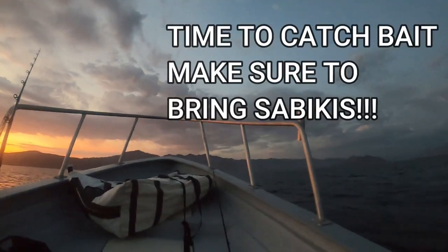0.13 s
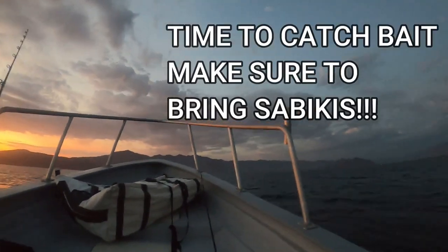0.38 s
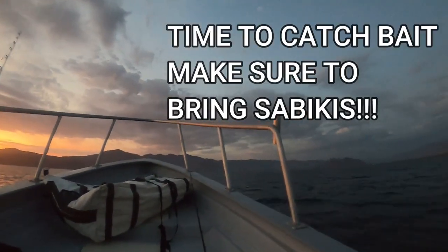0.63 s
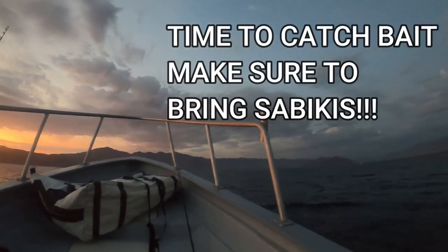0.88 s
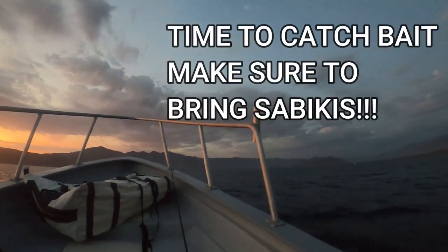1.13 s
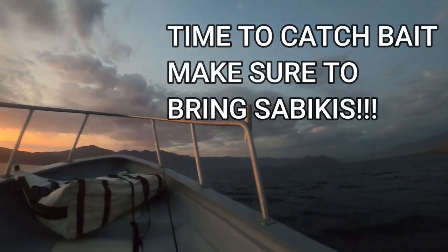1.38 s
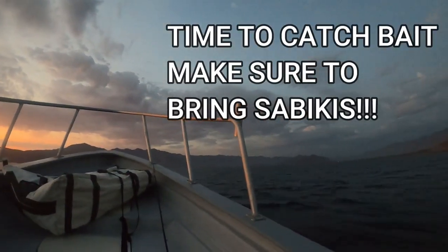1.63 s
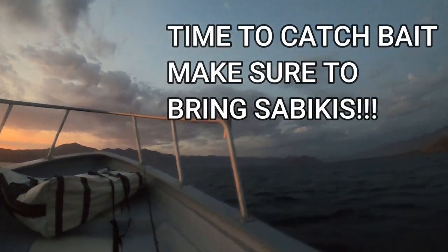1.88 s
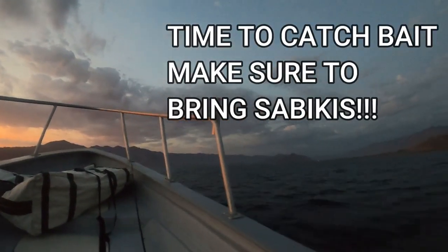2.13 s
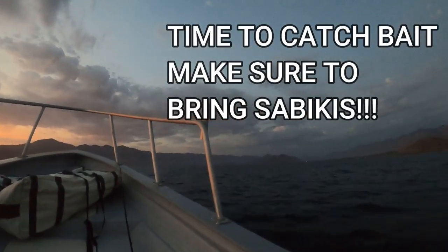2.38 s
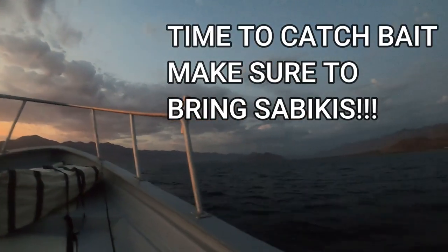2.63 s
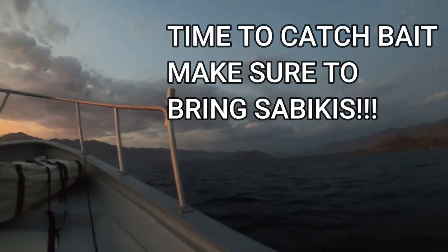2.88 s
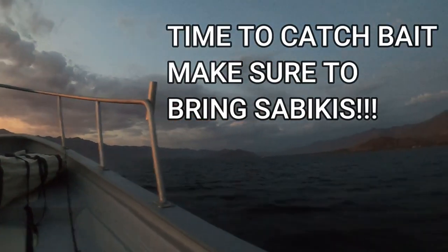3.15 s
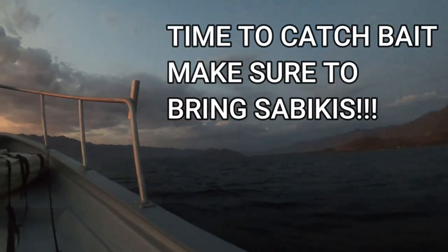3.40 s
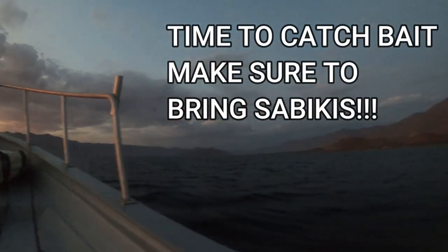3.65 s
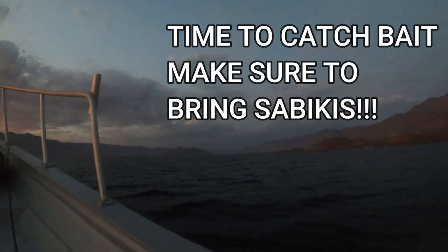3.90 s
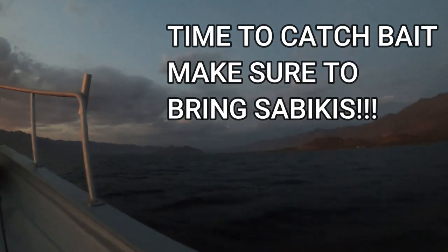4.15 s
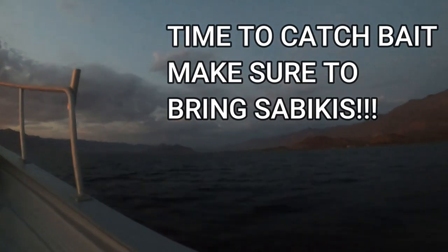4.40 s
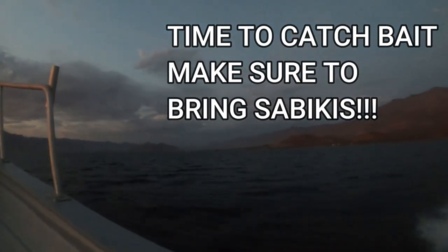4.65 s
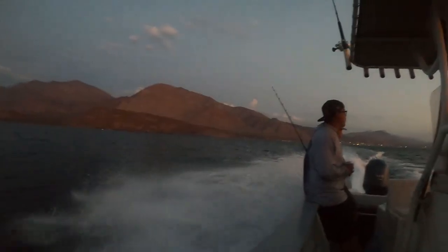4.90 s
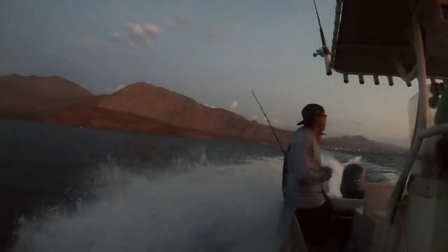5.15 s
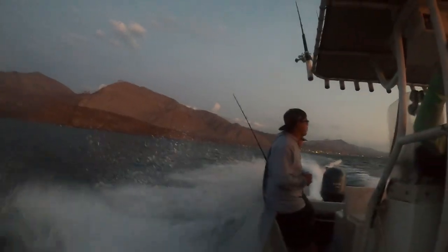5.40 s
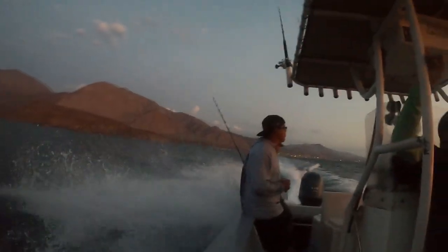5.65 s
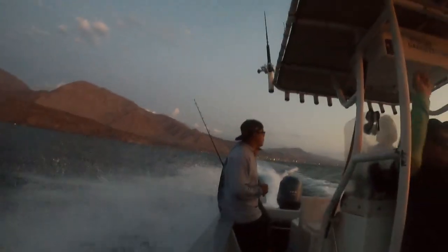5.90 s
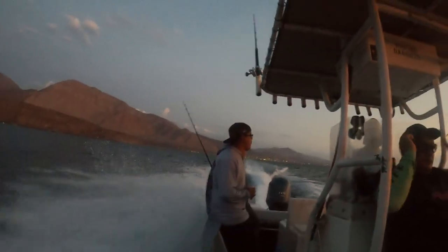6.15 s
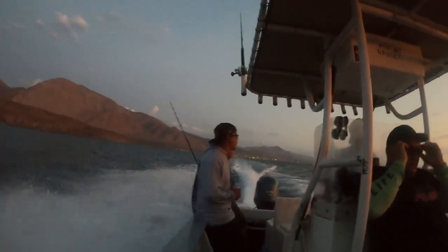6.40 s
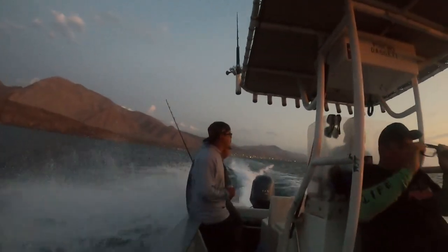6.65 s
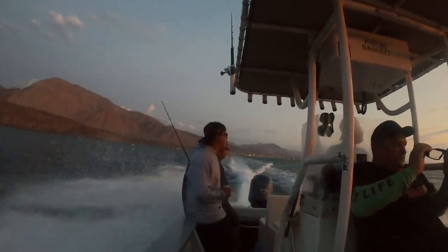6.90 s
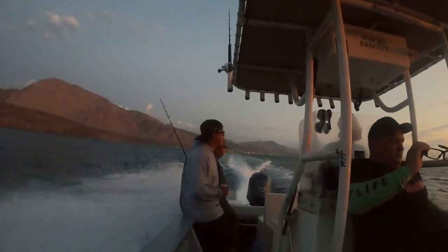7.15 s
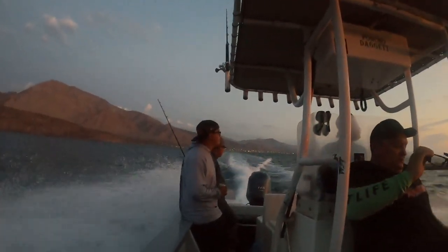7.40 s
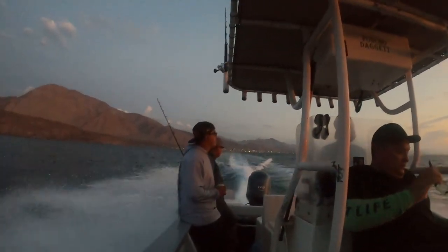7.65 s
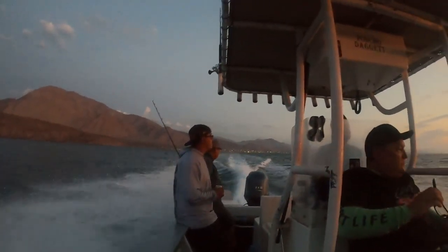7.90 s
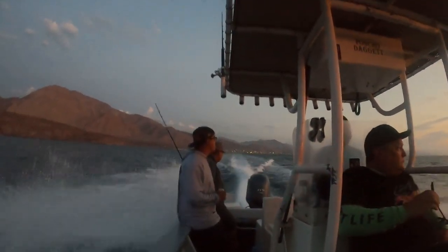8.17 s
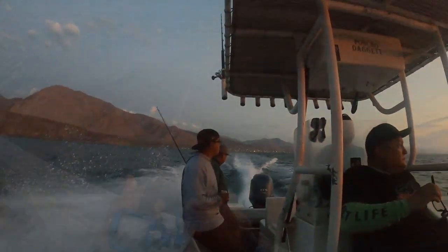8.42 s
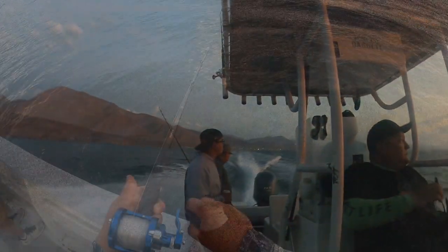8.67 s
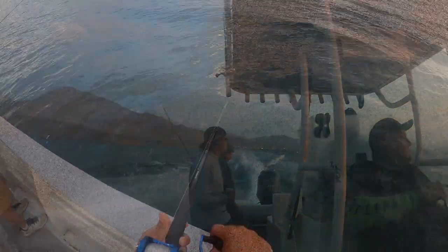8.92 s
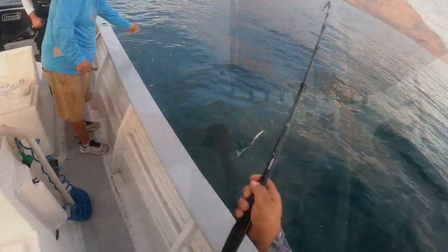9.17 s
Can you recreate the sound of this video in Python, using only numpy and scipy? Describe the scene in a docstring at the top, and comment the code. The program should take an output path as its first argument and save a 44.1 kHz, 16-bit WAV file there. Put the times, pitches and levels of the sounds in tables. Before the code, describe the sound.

A four-cylinder outboard hums at nearly constant cruising speed, first heard from the bow with muffled water and frequent wind thumps hitting the microphone. A sudden cut moves beside the wake, where hissing spray and surging wash cover a fluttering motor tone and a faint high whine. Deep gusts rumble underneath. Outdoors, close and unsheltered, the sound gradually sinks in the last second or so.

```python
"""A four-cylinder outboard drones at cruising speed: sine lines locked to the engine and propeller turns.
It is heard first from the bow, then after a cut from beside the wake, where the spray hisses louder.
Spray, wash, hull roar and wind rumble are shaped noise; wind scuffs are short lumpy bursts of noise.
A limiter softens the peaks, and the whole sound fades out at the end."""
import sys
import numpy as np
from scipy import signal
from scipy.fft import rfft, irfft
from scipy.io import wavfile
from scipy.ndimage import uniform_filter1d, minimum_filter1d

SR = 44100
rng = np.random.default_rng(int(sys.argv[2]) if len(sys.argv) > 2 else 0)


def store_pcm(level_fs):
    """Save levels as 16-bit WAV."""
    pcm = np.round(np.clip(level_fs, -1, 1) * 32767).astype(np.int16)
    wavfile.write(sys.argv[1], SR, np.atleast_2d(pcm).T)


def volts_from_db(level):
    """Convert decibel levels to linear amplitude ratios."""
    exponent = np.asarray(level, float) / 20
    return 10 ** exponent


N = 409688
CUT_S = 4.718  # the place of listening jumps from bow to stern


def evened(x):
    """Scales a sound to rms 1."""
    return x / np.sqrt(np.mean(x ** 2) + 1e-20)


def curves(tables):
    """Joins the rows of all tables by straight lines over time, giving one curve for each column."""
    rows = sum(map(list, tables), [])
    start_s, *columns = np.transpose(rows)
    return [np.interp(np.arange(N) / SR, start_s, column) for column in columns]


def humps(table):
    """Smooth swells in dB, one for each row (middle, length, heights)."""
    t = np.arange(N) / SR
    out = np.zeros((len(table[0]) - 2, N))
    for middle_s, length_s, *height_db in table:
        first = max(round((middle_s - length_s / 2) * SR), 0)
        part = slice(first, round((middle_s + length_s / 2) * SR))
        out[:, part] += np.outer(height_db, np.cos(np.pi * (t[part] - middle_s) / length_s) ** 2)
    return out


def wander(top_hz):
    """Slow random curve of rms 1: noise with little above top_hz, drawn at every 64th sample."""
    size = N // 64 + 2
    hz = np.fft.rfftfreq(size, 64 / SR)
    spectrum = rfft(rng.standard_normal(size)) / (1 + (hz / top_hz) ** 4)
    return np.interp(np.arange(N) / 64, np.arange(size), evened(irfft(spectrum, size)))


def noise(points, size, patchy_db, flicker_db, band_hz=None):
    """Random short-time spectra with drifting patches and a shared flicker; rms 1 overall or in band_hz."""
    frames = 4 * N // size + 5
    hz = np.fft.rfftfreq(size, 1 / SR)
    real, imaginary, patches = rng.standard_normal((frames, len(hz), 3)).T
    patches = uniform_filter1d(patches, size // 64, 0)  # neighbouring pitches
    patches = evened(uniform_filter1d(patches, 8192 // size, 1))  # neighbouring moments
    flicker = evened(uniform_filter1d(rng.standard_normal(frames), 2048 // size))
    pitch_hz, level_db = np.transpose(points)
    shape_db = np.interp(np.log(hz + 1), np.log(pitch_hz + 1), level_db, left=-90, right=-120)
    swing_db = patchy_db * patches + flicker_db * flicker
    spectra = (real + 1j * imaginary) * volts_from_db(shape_db[:, None] + swing_db)
    low_hz, high_hz = band_hz or (0, SR)
    power = volts_from_db(shape_db) ** 2
    share = power[(hz >= low_hz) & (hz <= high_hz)].sum() / power.sum()
    sound = signal.istft(spectra, nperseg=size, noverlap=size * 3 // 4)[1][:N]
    return evened(sound) / np.sqrt(share)


def line(turns, waver_db, blur, waver_hz):
    """One sine, rms 1 before its level (dB) and phase (radians) waver in the moving air."""
    level = np.sqrt(2) * volts_from_db(waver_db * wander(waver_hz))
    phase = 2 * np.pi * turns + blur * wander(waver_hz) + 7 * rng.random()
    return level * np.sin(phase)


# How fast the cylinders fire, before a slight random waver: start_s, pitch_hz
SPEED = [(0, 180), (1.25, 180.8), (2.25, 180), (3.25, 179.8), (3.75, 178.4), (4.25, 179.6), (4.75, 177.9),
         (5.25, 179.3), (5.75, 179), (6.25, 181.2), (6.75, 180.2), (7.25, 180.1), (7.75, 180.9),
         (8.25, 180.1), (9.3, 179.3)]


def engine_cycles():
    """Counts engine cycles by adding up the firing rate; four firings make one cycle."""
    firing_hz = curves([SPEED])[0] * (1 + 0.002493 * wander(2.404))
    return np.cumsum(firing_hz) / SR / 4


# Firing tone before dips and wavers, one list for the bow and one for the stern: start_s, level_db
DRONE = [
    [(0, -10.5), (0.1, -12), (1.2, -11.5), (2.1, -12), (3.0, -11), (3.9, -12), (4.71, -11)],
    [(4.73, -16), (5.0, -15.5), (5.35, -20), (5.9, -20.5), (6.3, -15.5), (7.0, -15.5), (7.6, -15.5),
     (7.85, -17), (8.1, -16.5), (8.7, -13), (9.29, -18)],
]
# Brief dips of the firing tone: middle_s, length_s, depth_db
DIPS = [(0.17, 0.032, 16), (0.379, 0.072, 4.0), (0.654, 0.07, 5), (0.953, 0.13, 8), (1.402, 0.16, 4),
        (1.591, 0.19, 3.5), (2.474, 0.099, 7.5), (2.883, 0.17, 3), (3.881, 0.061, 3), (5.063, 0.16, 10.1),
        (5.138, 0.045, 23), (5.213, 0.14, 13), (5.298, 0.041, 10), (5.857, 0.048, 10), (5.956, 0.13, 2.5),
        (6.176, 0.1, 13.0), (6.291, 0.065, 17), (6.485, 0.081, 9), (6.64, 0.057, 20), (7.114, 0.041, 15),
        (7.363, 0.069, 13.9), (7.553, 0.048, 10), (7.623, 0.041, 4), (7.762, 0.06, 10), (8.296, 0.046, 9.8),
        (8.566, 0.13, 18), (8.75, 0.078, 8)]
# Slow waver of the firing tone in the moving air: bow_db, stern_db
TONE_WAVER_DB = (1.0, 2.07)


def firing_tone(cycles, stern):
    """The strong tone of the drone, one sine wave for each firing."""
    bow_db, stern_db = TONE_WAVER_DB
    waver_db = np.where(stern, stern_db, bow_db) * wander(9.8)
    tone_db = curves(DRONE)[0] - humps(DIPS)[0] + waver_db
    return volts_from_db(tone_db) * line(4 * cycles, waver_db=0.8, blur=0.24, waver_hz=33)


# Fifth multiple of the firing tone, before its waver: start_s, level_db
WHINE = [(0, -43), (1, -46), (2.5, -45.5), (4.7, -55.5), (4.73, -44), (5.7, -42), (6.1, -38), (6.6, -36.5),
         (7.1, -36.5), (7.5, -38), (7.9, -44), (8.4, -41), (9.3, -43)]


def whine(cycles):
    """A thin high line at five times the firing rate."""
    return volts_from_db(curves([WHINE])[0]) * line(20 * cycles, waver_db=1.8, blur=0.9, waver_hz=13)


# Lines of unequal cylinders, set against hull roar plus WEAKER_LINES_DB:
# multiple of the engine cycle (played at the nearest whole number), bow_db, stern_db
PARTIALS = [(2.007, -12.5, -8.5), (2.97, -10.5, -16.5), (5.015, -7, -18.5), (6.003, -11, -20),
            (7.043, -10, -9.5), (8.03, -12.5, -17), (9.027, -12, -9.5), (10.07, -16.5, -14.5),
            (11.86, -22.5, -17.5), (14.07, -37, -23.5), (15, -35.5, -26.5), (15.92, -21, -19.5),
            (22, -33.5, -30), (24, -30, -24), (26, -31.5, -26.5), (29, -38, -28.5), (60, -38, -29.5)]
# Lines of the propeller, set against the same level: multiple of the propeller turn, bow_db, stern_db
BLADES = [(3, -14, -13.5), (6, -7, -13)]
# Shared level of the weaker engine and propeller lines over the hull roar: start_s, level_db
WEAKER_LINES_DB = [(0, 1.5), (2, -2), (4.7, 1.5), (4.75, -3), (5.6, -1), (6.1, 2), (7.5, -3.5), (9.3, 2.5)]


def weaker_lines(cycles, roar_db, stern):
    """Unequal cylinders and the propeller add weaker lines that follow the hull roar's level."""
    gear = 2.15  # engine turns per propeller turn
    lines_db = uniform_filter1d(roar_db, SR // 3) + curves([WEAKER_LINES_DB])[0]
    sound = np.zeros(N)
    for turns_per_cycle, table in ((1, PARTIALS), (2 / gear, BLADES)):  # two engine turns a cycle
        for multiple, bow_db, stern_db in table:
            level = volts_from_db(lines_db + np.where(stern, stern_db, bow_db))
            turns = round(multiple) * turns_per_cycle * cycles
            sound += level * line(turns, waver_db=2.8, blur=0.54, waver_hz=5.7)
    return sound


def engine(roar_db, stern):
    """The outboard: firing tone, whine and weaker lines, all locked to the same engine cycles."""
    cycles = engine_cycles()
    return firing_tone(cycles, stern) + whine(cycles) + weaker_lines(cycles, roar_db, stern)


# Water before surges and chop, one list for the bow and one for the stern: start_s, wash_db, spray_db
WATER = [
    [(0, -38.5, -51.5), (0.3, -40, -56), (0.9, -40.5, -53), (1.45, -38, -51.5), (1.65, -42, -54),
     (2.2, -44, -54), (3.0, -40.5, -52), (3.5, -44, -54.5), (3.8, -43, -49.5), (4.3, -41.5, -49),
     (4.6, -44, -51), (4.71, -42.5, -47)],
    [(4.72, -36, -40), (5.1, -36.5, -40.5), (5.6, -37, -40.5), (5.8, -34.5, -38.5), (6.35, -31.5, -38),
     (6.6, -34, -43), (7.2, -33, -42), (7.9, -33.5, -43.5), (8.5, -32.5, -45), (9.05, -33, -40.5),
     (9.29, -34, -48)],
]
# Waves that break against the hull (a negative rise sinks): middle_s, length_s, wash_rise_db, spray_rise_db
SURGES = [(0.52, 0.27, 1.5, 3), (0.82, 0.33, 4, 2.5), (2.86, .3, -2, 2.5), (3.4, .2, 1.5, 1.5),
          (5.05, 0.22, 2.5, -1), (5.38, 0.3, 4.5, 5), (5.49, .1, 4.5, -2), (6.1, 0.47, -1.5, 0.5),
          (6.46, 0.23, 4, 0.5), (6.77, 0.39, 2.5, 3), (7.0, 0.45, 1.5, 1), (7.57, 0.54, 2.5, 2),
          (8.05, 0.13, 2.5, 1), (8.45, 0.63, 1, 3), (8.9, 0.14, 2.5, 3.5)]
# Waver from small waves: wash_db, spray_db
CHOP_DB = (1.05, 1.0)


def water_levels():
    """Wash and spray levels in dB: breaking waves swell them and small waves make them waver."""
    chop_db = [CHOP_DB[0] * wander(5.3), CHOP_DB[1] * wander(11)]
    return curves(WATER) + humps(SURGES) + chop_db


# Tone colour of the spray at the bow: pitch_hz, level_db (per Hz, relative)
SPRAY_BOW = [(1500, -33), (2500, -6), (3300, -1.5), (4000, -6), (5000, -8.5), (7000, -14), (10000, -22.5),
             (12500, -37.5), (15000, -55.5)]
# Tone colour of the spray at the stern: pitch_hz, level_db (per Hz, relative)
SPRAY_STERN = [(1500, -38), (2500, 0), (3300, 0), (4600, -1), (6500, -7.5), (9600, -14), (11500, -23),
               (13000, -29.5), (15000, -57)]


def spray(level_db, stern):
    """Water torn by the hull: smooth and dull from the bow, bright and near at the stern."""
    bow = noise(SPRAY_BOW, size=512, patchy_db=0.46, flicker_db=0.5, band_hz=(3500, 10000))
    wake = noise(SPRAY_STERN, size=512, patchy_db=0.8, flicker_db=0.46, band_hz=(3500, 10000))
    return volts_from_db(level_db) * np.where(stern, wake, bow)


# Tone colour of the wash: pitch_hz, level_db (per Hz, relative)
WASH = [(400, -31.5), (650, -3), (900, 0), (1300, -4), (1800, -8), (2400, -10), (3200, -17.5), (4500, -26)]


def wash(level_db):
    """Water rushing past: mid-pitched noise that follows the wash level."""
    return volts_from_db(level_db) * noise(WASH, size=512, patchy_db=0.46, flicker_db=0.7, band_hz=(1000, 2600))


# Hull roar, one list for the bow and one for the stern: start_s, level_db
HULL = [
    [(0.0, -23.5), (0.68, -26), (1.53, -21.5), (1.88, -23.5), (2.36, -22), (2.69, -26), (3.48, -24),
     (4.4, -23), (4.71, -29)],
    [(4.73, -21.5), (5.39, -23), (5.83, -22.5), (6.54, -22), (7.71, -19), (8.31, -20.5), (8.61, -18),
     (9.29, -24.5)],
]
# Tone colour of the hull roar: pitch_hz, level_db (per Hz, relative)
ROAR = [(90, -20), (160, 3.5), (250, 3), (400, -2.5), (520, -6.5), (900, -19.5), (1500, -31.5),
        (2500, -41.5)]


def hull_roar():
    """Low, patchy noise of the hull; returns the sound and its level in dB."""
    roar_db = curves(HULL)[0]
    return volts_from_db(roar_db) * noise(ROAR, size=1024, patchy_db=2.0, flicker_db=1.1), roar_db


# Wind scuffing the microphone: start_s, length_s, level_db, upper_db (high part over low part)
SCUFFS = [(0.149, 0.034, -20.5, -14.5), (0.195, 0.022, -27.5, -15), (0.369, 0.021, -18.5, -15),
          (0.618, 0.02, -33, -16), (0.655, 0.028, -20.5, -17), (0.942, 0.037, -27, -19),
          (1.368, 0.045, -24, -11.5), (1.527, 0.047, -24, -16), (1.572, 0.032, -21.5, -11),
          (1.618, 0.017, -24.5, -20), (1.693, 0.069, -22.5, -11), (1.769, 0.05, -26, -9),
          (1.808, 0.033, -24, -25), (1.864, 0.026, -30, -18), (1.934, 0.036, -30, -24),
          (1.977, 0.057, -29.5, -10), (2.096, 0.013, -26.5, -17), (2.195, 0.034, -23.5, -14.5),
          (2.272, 0.013, -20.5, -17), (2.311, 0.011, -21, -10), (2.416, 0.011, -24, -15),
          (2.469, 0.029, -30, -8), (2.528, 0.032, -35, -3), (2.87, 0.024, -20.5, -8),
          (2.907, 0.019, -21.5, -14), (2.96, 0.029, -26.5, -12), (3.094, 0.014, -31, -17),
          (3.643, 0.062, -23, -8.5), (4.182, 0.023, -29.5, -5.5), (4.296, 0.016, -27, -6),
          (4.437, 0.029, -26.5, -13)]
# Tone colour of the low part of a scuff: pitch_hz, level_db (per Hz, relative)
SCUFF_LOW = [(120, -17.5), (300, 8), (700, 6.5), (1100, -1.5), (1600, -25), (3000, -47.5)]
# Tone colour of the high part of a scuff: pitch_hz, level_db (per Hz, relative)
SCUFF_HIGH = [(600, -23.5), (1200, 5), (1800, -2.5), (2600, -16), (4000, -25.5), (6000, -49)]


def scuffs():
    """Each puff of wind is a short lumpy burst; returns the bursts and the dip in dB they cause."""
    lumps = volts_from_db(2.1 * wander(160))
    low = lumps * noise(SCUFF_LOW, size=256, patchy_db=0.56, flicker_db=0.46)
    high = lumps * noise(SCUFF_HIGH, size=256, patchy_db=0.81, flicker_db=0.6)
    bursts, dip_db = np.zeros((2, N))
    for start_s, length_s, level_db, upper_db in SCUFFS:
        hump = signal.windows.tukey(round(SR * length_s), 0.3)
        start = round(start_s * SR)
        part = slice(start, start + len(hump))
        puff = evened(low[part]) + volts_from_db(upper_db) * evened(high[part])
        bursts[part] += volts_from_db(level_db) * hump * puff
        dip_db[part] += np.maximum(0.46 * (level_db + 30.5), 0) * hump  # stronger puffs mask more
    return bursts, dip_db


# Wind rumble before gusts, one list for the bow and one for the stern: start_s, level_db
WIND = [
    [(0, -30.5), (1.0, -27.5), (1.8, -26), (3.2, -26.5), (4.71, -26)],
    [(4.73, -21), (5.7, -20), (6.9, -26.5), (7.7, -23), (8.4, -25), (9.29, -25.5)],
]
# Gusts that swell the rumble (a negative rise sinks): middle_s, length_s, rise_db
GUSTS = [(0.165, 0.17, 9), (0.38, .15, 3), (0.66, 0.24, 9), (0.9, 0.22, 9), (1.1, 0.13, 6.5),
         (1.39, 0.14, 7), (1.58, .2, 8.5), (2.0, .25, 1), (2.5, .3, 5), (2.95, .2, -1), (3.5, 0.16, 4),
         (3.92, 0.26, 11), (4.3, .15, 4), (4.48, 0.14, 6), (5.05, 0.4, 3.5), (5.76, .2, 3), (6.15, .2, -1),
         (6.5, 0.18, -1), (7.05, .25, 6), (7.74, 0.22, 5), (8.07, 0.14, 6), (8.68, .3, 6)]
# Tone colour of the rumble: pitch_hz, level_db (per Hz, relative)
RUMBLE = [(10, -16), (20, -13), (45, 10.5), (90, 5.5), (140, 4.5), (200, -3), (300, -13.5), (500, -41)]


def wind_rumble():
    """Wind on the microphone: deep flickering noise that swells with the gusts."""
    level_db = curves(WIND)[0] + humps(GUSTS)[0]
    return volts_from_db(level_db) * noise(RUMBLE, size=2048, patchy_db=0.0, flicker_db=2.7)


def scene():
    """Adds all sources; scuffs push the engine down fully and the spray more gently."""
    stern = np.arange(N) >= CUT_S * SR
    roar, roar_db = hull_roar()
    wash_db, spray_db = water_levels()
    bursts, dip_db = scuffs()
    motor = engine(roar_db, stern) / volts_from_db(dip_db)
    hiss = spray(spray_db - 0.36 * uniform_filter1d(dip_db, 2000), stern)
    return (motor + hiss + wash(wash_db) + roar + bursts + wind_rumble())[None]


def low_pass(x):
    """Removes everything above the highest recorded frequency."""
    return signal.sosfilt(signal.butter(12, 15150, fs=SR, output="sos"), x)


def record(dry):
    """A fast limiter takes away about half of each peak's excess in dB; then comes the closing fade."""
    threshold_db, window = -8.5, 260  # window in samples
    fade_start_s, fade_db_per_s = 7.97, -7.5
    peak_db = -minimum_filter1d(-20 * np.log10(abs(dry[0]) + 1e-9), window)  # loudest sample nearby
    over_db = uniform_filter1d(np.maximum(peak_db - threshold_db, 0), window)
    fade_db = fade_db_per_s * np.maximum(np.arange(N) / SR - fade_start_s, 0)
    mix = dry * volts_from_db(fade_db - 0.51 * over_db)
    return low_pass(mix)


dry = scene()
out = record(dry)
store_pcm(out)
```